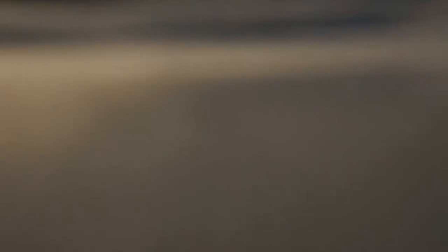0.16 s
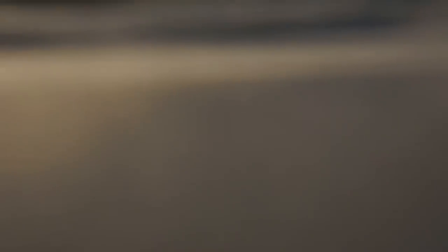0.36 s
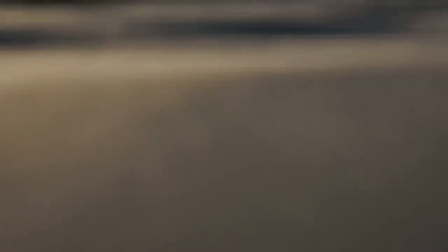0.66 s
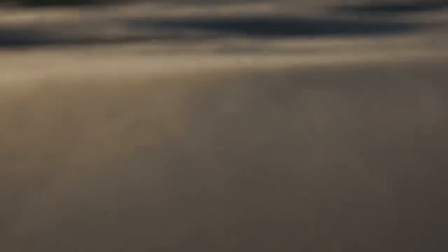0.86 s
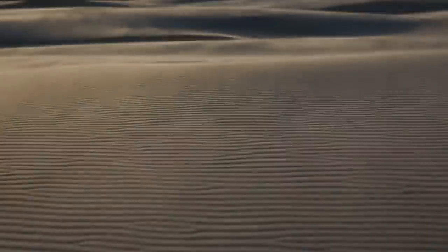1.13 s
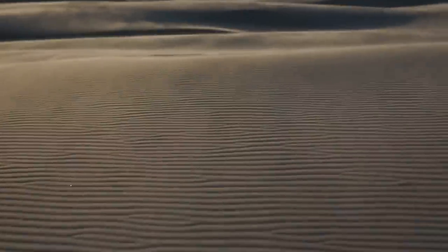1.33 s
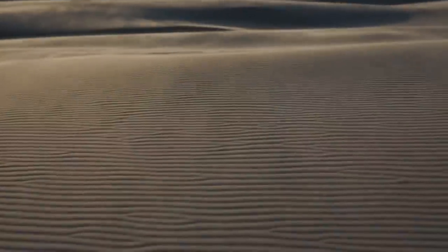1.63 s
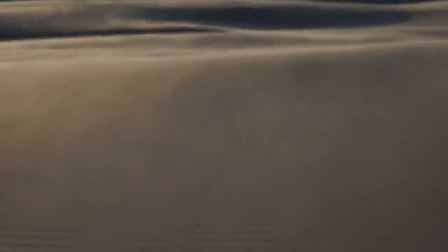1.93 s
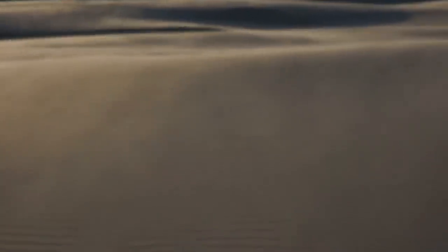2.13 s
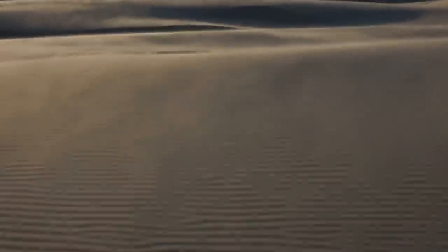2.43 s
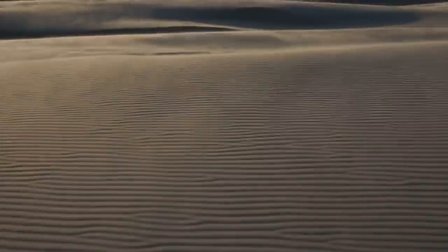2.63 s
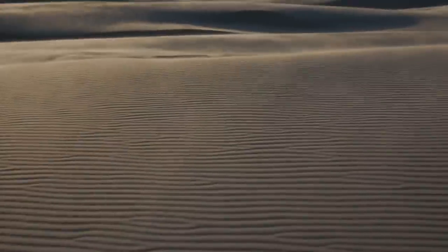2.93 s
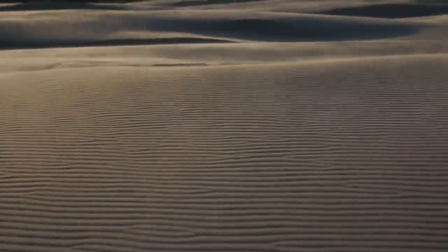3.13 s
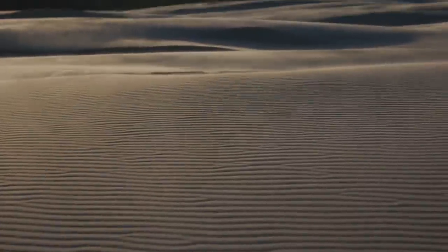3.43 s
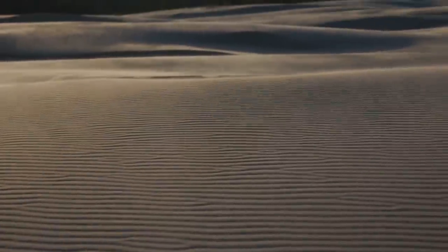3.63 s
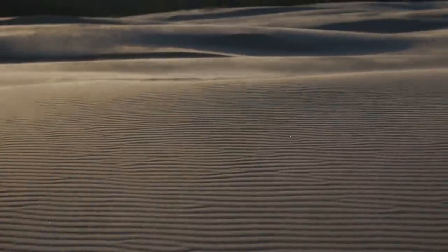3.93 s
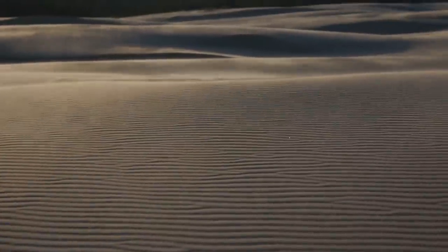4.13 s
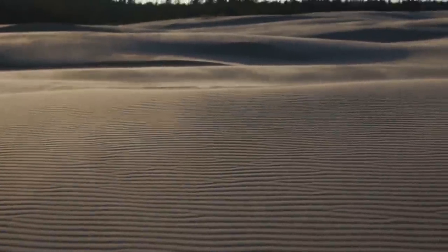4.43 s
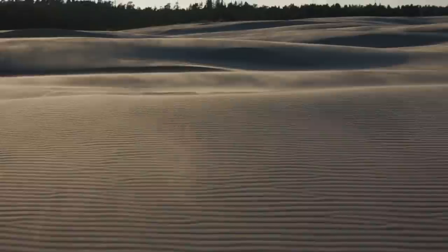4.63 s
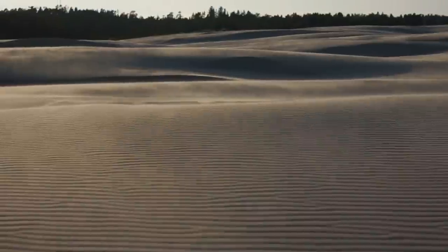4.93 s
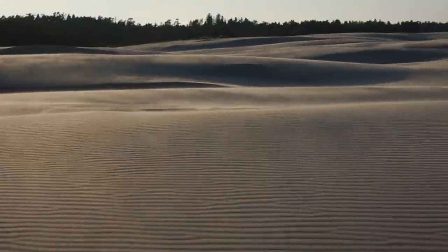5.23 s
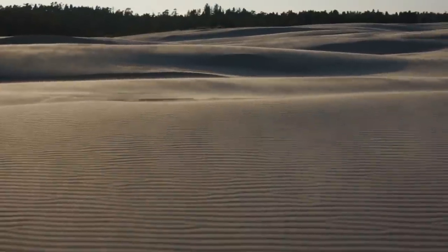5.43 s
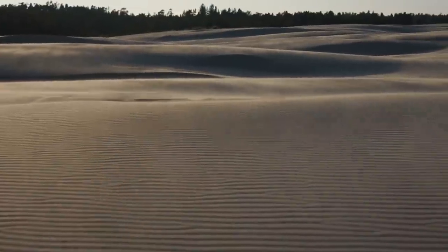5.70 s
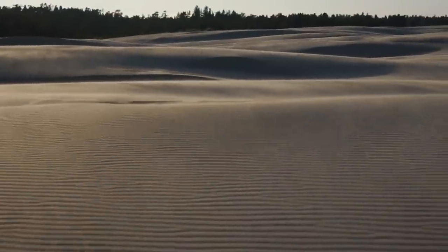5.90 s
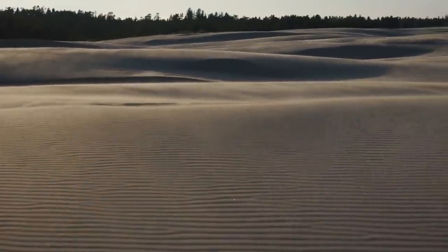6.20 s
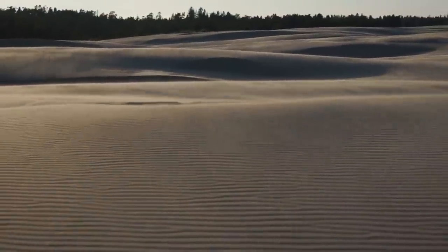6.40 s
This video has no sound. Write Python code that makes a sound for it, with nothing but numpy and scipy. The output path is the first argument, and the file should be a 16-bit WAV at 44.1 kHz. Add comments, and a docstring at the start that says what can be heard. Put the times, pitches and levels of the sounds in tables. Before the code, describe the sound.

Strong wind on open dunes blows straight into an unprotected stereo microphone for about 6.5 seconds, already at full force at the start and cut off while still blowing. Each side flutters independently: the right is louder, a nearly continuous ragged roar with crackling overload; the left is choppy, with short gusts and sudden lulls. Hard, bright cracks and dull thumps land irregularly, several per second. A faint sheet of blown sand hisses past around 0.5-1 s, then only thin hiss remains. From 0.8 to 1.5 s the left is weaker; it swells into fuller buffeting from 1.7 to 2.4 s. Airy whishes brush the left near 1.8, 2.7, 3.3, 4.4 and 5.2 s. The left thins around 3.5-4.2 s, rises again near 4.6 s, sinks after 5 s, and gusts continue on both sides to the end. Dry, close, no echo.

```python
"""Strong wind over open sand dunes buffets the two ports of a microphone, each on its own.
One air speed per port rises in gusts and drops in lulls. It drives four bands of bunched noise, from rumble to
rasp; the brightest grows fastest with speed. Fast air also pushes the diaphragm to its stop, which crackles.
Single hard eddies crack, big slow ones thump, and streams of small ones whish over the left port.
Blown sand, a steady noise with slowly changing level, hisses faintly underneath."""
import sys
import numpy as np
from scipy import signal
from scipy.fft import rfft, irfft
from scipy.io import wavfile

SR = 44100
rng = np.random.default_rng(int(sys.argv[2]) if len(sys.argv) > 2 else 0)


def to_wav(s):
    """Save 16-bit WAV."""
    ch = np.atleast_2d(s).T  # columns
    pcm = np.round(np.clip(ch, -1, 1) * 32767)  # PCM
    wavfile.write(sys.argv[1], SR, pcm.astype(np.int16))


N = 289296
TIME = np.arange(N) / SR


def amp(db):
    """Turns decibels into a gain."""
    return 10 ** (np.asarray(db) / 20)


def unit(x):
    """Scales a signal to an rms of 1."""
    return x / np.sqrt(np.mean(x ** 2) + 1e-20)


def curve(points):
    """Draws straight lines between (time [s], value) points, one value per sample."""
    return np.interp(TIME, *np.transpose(points))


def through_port(x, colour, size=8192):
    """Filters a sound to a colour, with the bands that cancel inside the microphone housing cut out."""
    # cancelled bands: (centre [Hz], width [Hz], depth [dB])
    notches = [(607.5, 83, -9.5), (1377, 240, -14), (2363, 310, -15.5), (3450, 410, -11.5)]
    hz = np.fft.rfftfreq(size, 1 / SR)
    points_hz, points_db = np.transpose(colour)
    db = np.interp(np.log(hz + 1), np.log(points_hz), points_db)
    for centre_hz, width_hz, depth_db in notches:
        db = db + depth_db / (1 + (2 * (hz - centre_hz) / width_hz) ** 2)
    # minimum phase: the filter answers at once and never ahead of the sound
    log_gain = np.log(amp(np.r_[db, db[-2:0:-1]]))
    spectrum = np.exp(np.conj(signal.hilbert(log_gain)))
    taps = np.fft.ifft(spectrum).real[:size // 2]
    # energy 1, so a colour sets only the balance of pitches
    return signal.oaconvolve(x, taps / np.linalg.norm(taps))[:N]


def eddies(slow_hz, fast_hz):
    """Random swirl of rms 1, with equal power per octave between two rates and softly limited peaks."""
    hz = np.fft.rfftfreq(N, 1 / SR) + 1e-6
    below_slow = 1 + (slow_hz / hz) ** 4
    above_fast = 1 + (hz / fast_hz) ** 4
    shape = (hz * below_slow * above_fast) ** -.5
    swirl = unit(irfft(rfft(rng.standard_normal(N)) * shape, N))
    return unit(np.tanh(0.63 * swirl))


def envelope(start, length):
    """Fades one event in, holds it and fades it out; gives (samples covered, envelope)."""
    attack_s, release_s = 0.015, 0.012
    span = slice(*np.searchsorted(TIME, [start - attack_s, start + length + release_s]))
    t = TIME[span] - start
    fade_in = np.clip(t / attack_s + .5, 0, 1)
    fade_out = np.clip((length - t) / release_s + .5, 0, 1)
    return span, fade_in * fade_out


def holds(table, port):
    """Picks the events that meet one port, each as (samples covered, envelope, dB)."""
    return [(*envelope(start, length), db) for start, length, db, side in table if round(side) == round(port)]


def air_speed(flow, port):
    """Speed of the air at one port in dB: lulls and gusts pull the flow toward their own speed for a moment."""
    # gusts that strike a port: (start [s], length [s], air speed [dB], port [0 left, 1 right])
    gusts = [(0, 0.04, 5, 0), (0.106, 0.041, 12, 0), (0.184, 0.0088, 18, 1), (0.332, 0.1, 9.5, 1),
             (0.333, 0.011, 7, 0), (0.414, 0.022, 14, 0), (0.494, 0.022, 13.5, 0), (0.581, 0.012, 5, 1),
             (0.582, 0.12, 0.5, 0), (0.725, 0.023, 0.5, 1), (0.89, 0.16, 2.5, 0), (0.932, 0.083, 10, 1),
             (1.139, 0.056, 9, 1), (1.265, 0.028, 6, 0), (1.262, 0.11, 10, 1), (1.362, 0.039, 3.5, 0),
             (1.425, .05, 5, 1), (1.516, 0.025, 1.5, 0), (1.555, 0.016, 16, 1), (1.61, 0.087, 4.5, 0),
             (1.625, 0.11, 8, 1), (2.102, 0.33, 7, 0), (2.354, 0.019, 0, 1), (2.44, 0.032, 15, 0),
             (2.56, 0.019, 12, 0), (2.664, 0.098, 5.5, 0), (2.817, 0.054, 1, 0), (2.931, 0.013, 11, 1),
             (2.932, 0.13, 3.5, 0), (3.031, 0.24, 8, 1), (3.173, 0.021, 3.5, 0), (3.365, 0.088, 6, 1),
             (3.531, 0.07, 6, 1), (3.304, 0.12, 4, 0), (3.525, 0.017, 13, 0), (3.585, .014, 2, 0),
             (3.617, 0.021, 0, 0), (3.693, 0.019, 12.5, 0), (3.749, 0.048, 11, 1), (3.84, 0.053, -3, 0),
             (4.108, 0.014, 16.5, 1), (4.209, 0.017, 2, 0), (4.243, .012, 7, 1), (4.281, 0.037, 14, 1),
             (4.325, 0.08, 9, 1), (4.35, 0.058, 1.5, 0), (4.567, 0.0084, 21, 1), (4.635, 0.073, 5.5, 0),
             (4.81, .016, 1.5, 0), (4.957, 0.061, 13.5, 1), (5.11, 0.022, 6, 1), (5.115, 0.027, 2, 0),
             (5.276, 0.017, 4, 0), (5.392, 0.049, 8, 0), (5.56, 0.013, 14, 1), (5.686, 0.017, 11, 1),
             (5.7, 0.052, 0, 0), (5.834, 0.012, 1, 0), (5.836, 0.12, 12, 1), (5.908, 0.036, 4.5, 0),
             (6.022, 0.03, 6, 0), (6.071, 0.012, 13, 1), (6.236, 0.045, 10, 1), (6.279, 0.038, 4.5, 0),
             (6.418, 0.034, 0.5, 0), (6.496, 0.036, 14.5, 1)]
    # lulls that leave a port in the lee: (start [s], length [s], air speed [dB], port [0 left, 1 right])
    lulls = [(.082, 0.21, -2.5, 1), (.205, 0.051, -28, 0), (.305, 0.019, -23, 1), (.448, 0.063, -28, 0),
             (.45, 0.27, -1, 1), (.502, 0.043, -13, 1), (.53, 0.07, -21, 0), (.676, 0.023, -2, 1),
             (.72, 0.048, -32, 0), (1.065, 0.043, -20, 0), (1.127, 0.012, -1, 1), (1.483, 0.075, -4, 1),
             (1.55, .055, -25, 0), (1.89, 0.048, -5, 1), (2.096, 0.025, 4, 1), (2.295, 0.042, -15, 1),
             (2.385, 0.084, -8, 1), (2.482, 0.015, -18, 0), (2.58, 0.042, -28, 0), (2.872, 0.028, -10, 1),
             (3.11, 0.025, -26, 0), (3.196, 0.03, -21, 0), (3.33, 0.023, -7, 1), (3.42, 0.034, -26, 0),
             (3.547, 0.024, -28, 0), (3.695, 0.063, -2.5, 1), (3.72, 0.03, -21, 0), (3.86, 0.11, -7.5, 1),
             (3.9, 0.097, -21, 0), (3.97, 0.17, 0, 1), (4.055, 0.037, -39, 0), (4.185, 0.014, -17, 1),
             (4.306, 0.028, -19, 0), (4.405, 0.046, -2, 1), (4.5, 0.024, -15, 0), (4.635, 0.053, 3.5, 1),
             (4.69, 0.14, 4.5, 1), (5.088, 0.012, -5.5, 1), (5.15, 0.022, -17, 1), (5.155, 0.024, -28, 0),
             (5.425, 0.046, -15, 1), (5.495, 0.055, 1, 1), (5.6, 0.085, -9, 0), (5.725, 0.038, 1.5, 1),
             (5.939, 0.018, -8, 0), (6.132, 0.039, -38, 0), (6.165, 0.058, -12, 1), (6.249, 0.029, -14, 0),
             (6.31, 0.062, -10, 1), (6.37, 0.061, 2.5, 1), (6.371, 0.023, -16, 0), (6.46, 0.041, -2, 1),
             (6.471, 0.041, -30, 0)]
    wander_db = 1.23  # rms unsteadiness of the air speed
    speed_db = curve(flow)
    for span, hold, db in holds(lulls + gusts, port):
        speed_db[span] += hold * (db - speed_db[span])
    return speed_db + wander_db * eddies(slow_hz=5.0, fast_hz=23.7)


def turbulence(colour, swirl_db, level_db, size=3001):
    """Pressure noise that the swirl bunches into bursts, while its short-term strength follows a given level."""
    bunched = through_port(rng.standard_normal(N) * amp(swirl_db), colour)
    window = np.hanning(size)
    power = signal.oaconvolve(bunched ** 2, window / window.sum(), "same")
    return bunched / np.sqrt(abs(power) + 1e-12) * amp(level_db)


def wind(speed_db, swirl, port, trim_db, rasp_trim_db):
    """Eddies of four sizes ride one swirl; the smallest grow fastest with speed and churn partly on their own."""
    # colours from the largest eddies to the smallest: (frequency [Hz], relative level [dB per Hz])
    rumble_colour = [(10, -20), (25, -8), (52, 8.5), (70, 4.5), (100, -1), (200, -56), (800, -85)]
    throb_colour = [(60, -48), (105, -26), (150, -12), (220, -5), (340, 0), (500, -0.5), (800, -10.5),
                    (1300, -29.5), (4000, -101)]
    flutter_colour = [(100, -40.5), (230, -18.5), (440, -3), (750, -1.5), (1050, -7.5), (1400, -21.5),
                      (2100, -30), (4000, -59), (9000, -100)]
    rasp_colour = [(200, -49.5), (600, 7.5), (1100, 13), (1800, -0.5), (2600, -8.5), (4000, -24.5),
                   (6000, -40), (14000, -74)]
    # deep rumble before speed and trims act on it: (time [s], level [dB])
    rumble_level = [(0, -49), (1.0, -48.5), (1.06, -60), (2.57, -45), (2.72, -60), (3.58, -49),
                    (5.43, -54.5), (5.55, -60), (5.75, -46), (6.16, -50.5), (6.56, -48)]
    own = 0.54  # share of the small eddies' own swirl, 0-1

    thump_db = thumps(port)
    fine_swirl = np.sqrt(1 - own ** 2) * swirl + own * eddies(slow_hz=30, fast_hz=200)
    rumble_db = curve(rumble_level) + 1.5 + 0.15 * speed_db
    throb_db = -21.5 + 0.39 * speed_db + thump_db
    flutter_db = -24.0 + 0.67 * speed_db + 0.23 * thump_db
    rasp_db = -34 + 1.12 * speed_db + rasp_trim_db
    rumble = turbulence(rumble_colour, 2.2 * swirl, rumble_db, size=12001)
    throb = turbulence(throb_colour, 3.0 * swirl, throb_db, size=4501)
    flutter = turbulence(flutter_colour, 5.1 * swirl, flutter_db, size=4501)
    rasp = turbulence(rasp_colour, 6.4 * fine_swirl, rasp_db, size=4501)
    return amp(trim_db) * (rumble + throb + flutter + rasp)


def sand(speed_db, trim_db):
    """Grains blown over the dune hiss softly: one passing sheet, and wisps that thin out in the lulls."""
    # colours of wisps and sheet: (frequency [Hz], relative level [dB per Hz])
    wisp_colour = [(1000, -14), (2000, -4), (3000, 7), (4300, -1.5), (6000, -11.5), (7200, -14),
                   (14000, -24.5)]
    sheet_colour = [(1000, -15), (1800, 11), (2400, 6), (2950, 8), (3450, 0), (3900, 5), (4350, -1),
                    (4900, -8), (7000, -22), (14000, -29)]
    # wisps before speed, flicker and trim: (time [s], level [dB])
    drift = [(0, -58), (.25, -62), (.275, -50), (.32, -62), (.6, -62), (1.5, -64), (3.9, -62.5),
             (4.15, -60.5), (4.9, -62), (5.1, -59), (5.8, -59), (6.2, -62), (6.56, -63)]
    # sheet that sweeps past early on, before trim: (time [s], level [dB])
    sheet_level = [(0, -70), (.2, -66), (.45, -57), (.7, -50), (.9, -54), (1.15, -63), (1.5, -85)]
    wisps_db = curve(drift) + 0.11 * speed_db + 1.6 * eddies(slow_hz=0.81, fast_hz=3.8)
    wisps = through_port(rng.standard_normal(N), wisp_colour) * amp(wisps_db)
    sheet = through_port(rng.standard_normal(N), sheet_colour) * amp(curve(sheet_level))
    return amp(trim_db) * (wisps + sheet)


def overload(speed_db, swirl, gain_db, margin_db):
    """Fast air pushes the diaphragm to its stop, where random kinks in the pressure tick; below it is silence."""
    # colour of the crackle: (frequency [Hz], relative level [dB per Hz])
    crackle_colour = [(100, -38), (380, -5), (850, 4), (1700, -9), (2700, -15.5), (4000, -21),
                      (6000, -31.5), (10000, -42), (14000, -50.5)]
    stop_db, knee_db = 4.6, 4  # air speed at the stop ahead of the port's margin, and width of the onset
    kinks_per_s, scatter_db, fuzz = 1200, 5.5, 0.06  # fuzz: weak noise among the kinks
    bunch_db, spells_db = 2.5, 1.0
    is_kink = rng.random(N) < kinks_per_s / SR
    direction = rng.choice([-1, 1], N)
    strength = amp(scatter_db * np.clip(rng.standard_normal(N), -2, 2))
    ticks = unit(is_kink * direction * strength + fuzz * rng.standard_normal(N))
    # slow pressure swings push toward the stop, so the crackle comes in spells
    travel_db = speed_db + 1.81 * swirl + spells_db * eddies(slow_hz=21, fast_hz=60)
    at_stop = np.clip(.5 + (travel_db - stop_db - margin_db) / knee_db, 0, 1)
    level_db = gain_db + 0.36 * speed_db + bunch_db * swirl
    return through_port(ticks * at_stop * amp(level_db), crackle_colour)


def slaps(port):
    """Hard eddies throw the diaphragm against its stop: each makes one short, bright crack."""
    # cracks before the common trim: (time [s], level [dB], port [0 left, 1 right])
    slap_events = [(.061, -11, 0), (.123, -8, 0), (.152, -17, 0), (0.183, -23, 1), (.268, -25, 1),
                   (.341, -13, 1), (.343, -12, 0), (0.398, -14, 1), (.434, -5.5, 0), (0.501, -13, 0),
                   (.521, -25, 0), (.584, -19, 1), (.597, -16.5, 0), (0.61, -11, 0), (.643, -16.5, 0),
                   (0.67, -17, 0), (.752, -28, 1), (0.815, -8.5, 1), (.835, -8, 1), (.883, -32, 1),
                   (.915, -10, 0), (1.002, -8, 0), (1.034, -20, 0), (1.12, -11, 1), (1.155, -8, 1),
                   (1.171, -13, 0), (1.381, -17, 0), (1.439, -15, 1), (1.468, -17, 1), (1.556, -23, 1),
                   (1.611, -20, 0), (1.633, -5, 1), (1.852, -6.5, 1), (1.887, -14, 0), (1.894, -16, 1),
                   (1.929, -17, 1), (1.971, -27, 0), (1.994, -13, 1), (2.149, -10, 0), (2.207, -10, 1),
                   (2.238, -6.5, 1), (2.316, -10.5, 0), (2.333, -22, 1), (2.436, -6, 0), (2.448, -18, 1),
                   (2.508, -20, 0), (2.544, -12.5, 1), (2.561, -9, 0), (2.576, -7.5, 1), (2.625, -4, 1),
                   (2.673, -8, 0), (2.687, -7, 0), (2.831, -13, 0), (2.852, -17, 0), (2.931, -6.5, 0),
                   (2.983, -6, 1), (3.056, -19, 0), (3.125, -13.5, 1), (3.176, -15, 0), (3.201, -5, 1),
                   (3.322, -18, 0), (3.371, -16, 1), (3.414, -9.5, 1), (3.489, -9.5, 1), (3.533, -11.5, 1),
                   (3.619, -7.5, 0), (3.676, -19, 0), (3.835, -16, 1), (3.865, -20, 0), (3.89, -20.5, 1),
                   (3.989, -22, 1), (4.047, -13.5, 1), (4.113, -9.5, 1), (4.152, -4.5, 1), (4.174, -29, 1),
                   (4.21, -12.5, 0), (4.275, -18, 0), (4.372, -28, 0), (4.388, -19, 0), (4.449, -27, 0),
                   (4.479, -14, 1), (4.491, -19, 0), (4.535, -20, 0), (4.572, -7, 1), (4.642, -11, 0),
                   (4.736, -19, 0), (4.757, -17, 0), (4.777, -10.5, 1), (4.826, -6, 1), (4.931, -27, 1),
                   (4.99, -11, 1), (5.028, -8, 1), (5.144, -23, 1), (5.176, -17, 1), (5.215, -5, 1),
                   (5.279, -14, 0), (5.288, -6, 1), (5.325, -17, 1), (5.387, -11, 1), (5.419, -9.5, 0),
                   (5.482, -20, 1), (5.559, -15, 1), (5.663, -8, 1), (5.693, -19, 1), (5.728, -21, 1),
                   (5.755, -25, 1), (5.803, -16, 1), (5.833, -11, 0), (5.855, -6, 1), (5.969, -11.5, 0),
                   (6.005, -8, 1), (6.042, -3, 1), (6.144, -12, 1), (6.295, -22, 0), (6.332, -25, 1),
                   (6.433, -9.5, 0), (6.45, -25, 1), (6.51, -8, 1)]
    # colour of a crack: (frequency [Hz], relative level [dB per Hz])
    snap_colour = [(100, -37), (380, -4), (850, 1.5), (1700, -6), (2700, -13.5), (4000, -19.5), (6000, -31),
                   (10000, -42), (14000, -47.5)]
    burst_s, slap_trim_db = .0015, -1.5
    drive = np.zeros(N)
    for start, db, side in slap_events:
        if round(side) == round(port):
            crack = drive[round(start * SR):][:round(burst_s * SR)]
            crack += amp(db + slap_trim_db) * unit(rng.standard_normal(len(crack)))
    return through_port(drive, snap_colour)


def thumps(port):
    """Big slow eddies roll over the port: extra throb in dB, without a brighter rush."""
    # thumps: (start [s], length [s], extra throb [dB], port [0 left, 1 right])
    thump_events = [(.255, 0.017, 16.5, 0), (.6, 0.018, 14, 0), (.75, 0.18, 5.5, 1), (.77, 0.018, 15, 0),
                    (.88, 0.047, 8, 0), (1.59, 0.14, 2, 1), (2.22, 0.3, 2, 0), (2.48, 0.16, 2.5, 1),
                    (4, 0.3, 5.5, 0), (4.015, 0.095, 6, 1), (4.095, 0.11, 4, 1), (4.243, 0.068, 4, 1),
                    (5.78, 0.11, 8, 0), (6.415, 0.045, 9, 0), (6.42, 0.084, 4.5, 1)]
    thump_db = np.zeros(N)
    for span, hold, db in holds(thump_events, port):
        thump_db[span] += hold * db
    return thump_db


def whishes(swirl):
    """Streams of small eddies over the rim swell and fade as airy, fluttering bands of noise."""
    # streams, level before the band's width counts:
    # (start [s], length [s], level [dB], upper edge [Hz])
    streams = [(1.61, .1, -43, 4500), (1.77, 0.21, -40, 4300), (2.643, 0.12, -38, 4700),
               (3.29, 0.14, -37, 4500), (4.22, 0.054, -48, 4700), (4.34, .27, -41, 4800),
               (4.676, .08, -53, 4370), (4.96, .08, -55, 3300), (5.24, 0.19, -43, 4600),
               (6.028, .07, -46, 3800)]
    # colour of a whish: (frequency [Hz], relative level [dB per Hz])
    whish_colour = [(600, -20), (1700, 8), (2800, -4), (4500, -13), (9000, -15)]
    bunch_db = 6  # depth of the flutter
    drive = np.zeros(N)
    for start, length, db, top_hz in streams:
        span, hold = envelope(start, length)
        lowpass = signal.butter(8, top_hz, fs=SR, output="sos")
        band = signal.sosfilt(lowpass, rng.standard_normal(N))
        fluttering = unit((band * amp(bunch_db * swirl))[span])
        # a wider band carries more power
        drive[span] += amp(db) * hold * fluttering * np.sqrt(2 * top_hz / SR)
    return through_port(drive, whish_colour)


def scene():
    """Each port meets its own eddies; the right one faces the wind more."""
    # flow at each port between gusts and lulls: (time [s], air speed [dB])
    flow_left = [(0, 1), (.78, -16), (1, -10), (1.5, -6), (1.75, 2), (2.1, 5), (2.52, -9), (3.3, -5),
                 (3.5, -13), (4, -14.5), (4.55, 1.5), (4.85, -1), (5.08, -17), (5.4, -5), (5.6, -13),
                 (5.8, -7.5), (6.2, -4), (6.56, -6)]
    flow_right = [(0, 8.5), (0.7, 4.5), (1.15, 7), (1.45, 3.5), (1.8, 7.5), (2.0, 3.5), (2.65, 7.5),
                  (2.85, 4.5), (3.15, 8), (3.65, 5), (4.1, 4.5), (4.7, 5.5), (4.9, 5.5), (5.25, 7.5),
                  (5.75, 2), (6.0, 7.5), (6.3, 1.5), (6.56, 6.5)]

    speed_db = air_speed(flow_left, port=0)
    swirl = eddies(slow_hz=22.5, fast_hz=144)
    left = wind(speed_db, swirl, port=0, trim_db=-0.5, rasp_trim_db=-1.5)
    left = left + overload(speed_db, swirl, gain_db=-28.0, margin_db=-0.76)
    left = left + slaps(port=0) + whishes(swirl) + sand(speed_db, trim_db=-0.5)

    speed_db = air_speed(flow_right, port=1)
    swirl = eddies(slow_hz=31.2, fast_hz=170)
    right = wind(speed_db, swirl, port=1, trim_db=1.0, rasp_trim_db=0.5)
    right = right + overload(speed_db, swirl, gain_db=-23.5, margin_db=1.0)
    right = right + slaps(port=1) + sand(speed_db, trim_db=-1.0)
    return np.array([left, right])


def record(dry):
    """Rounds off the hardest blows near full scale, then cuts the top of the treble."""
    edge_hz = 14400
    rounded = dry / (1 + dry ** 8) ** (1 / 8)
    lowpass = signal.firwin(161, edge_hz, window=("kaiser", 9), fs=SR)
    return signal.oaconvolve(rounded, lowpass[None], "same")


dry = scene()
out = record(dry)
to_wav(out)
```